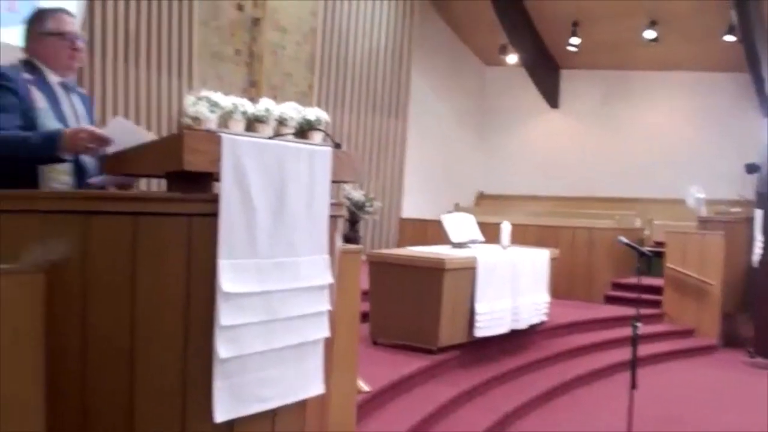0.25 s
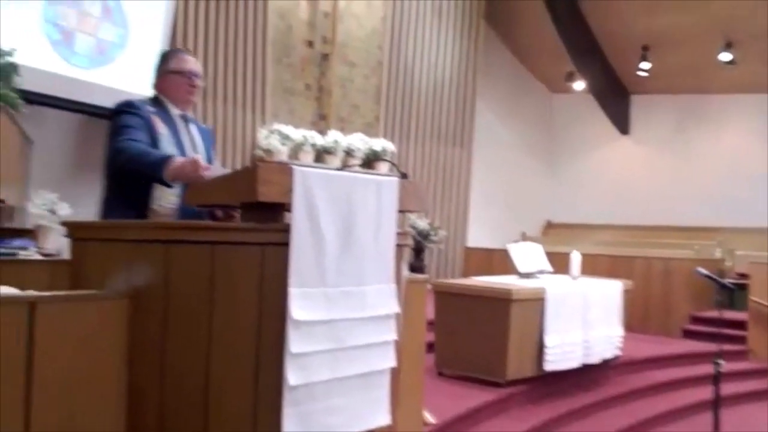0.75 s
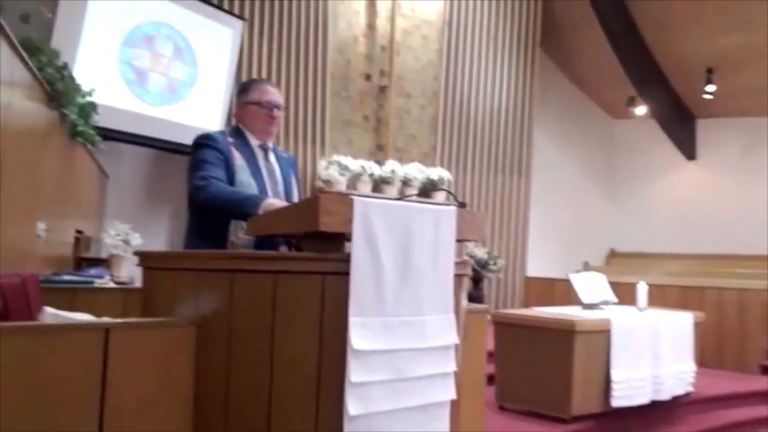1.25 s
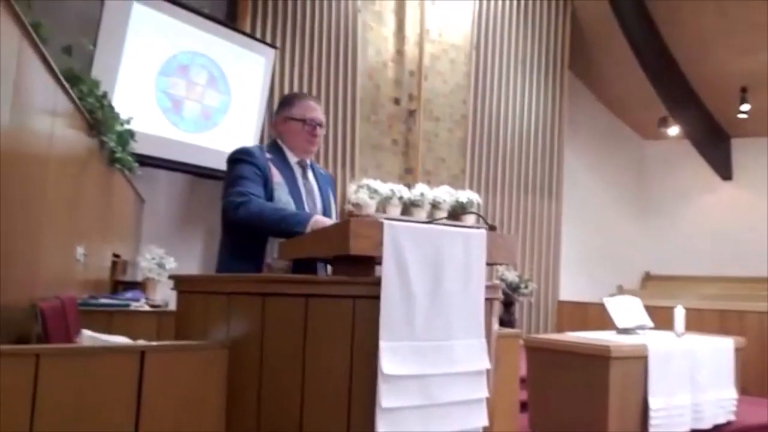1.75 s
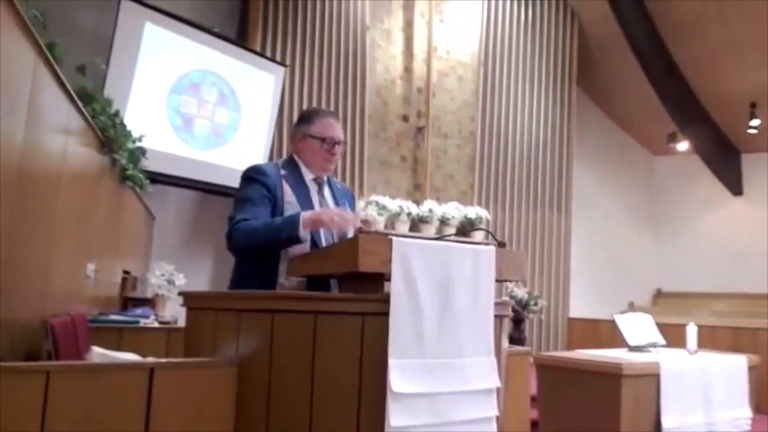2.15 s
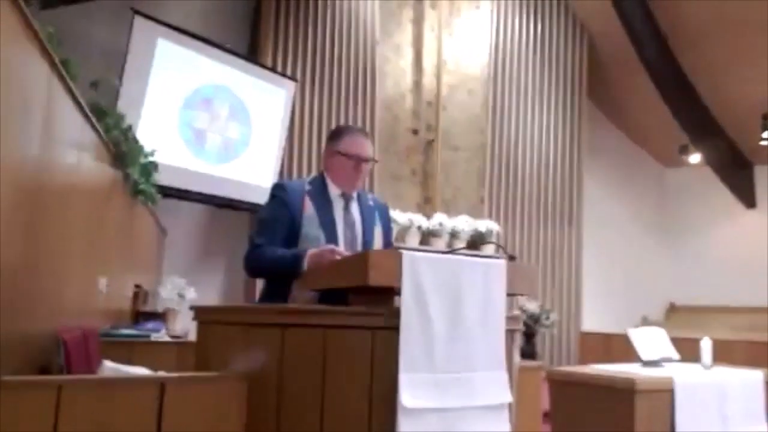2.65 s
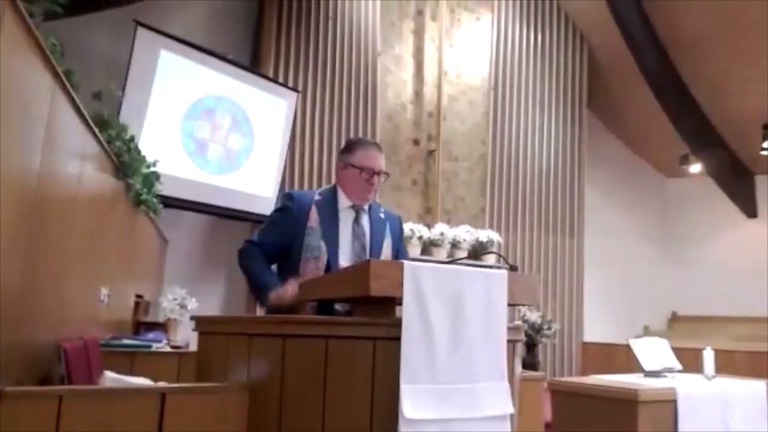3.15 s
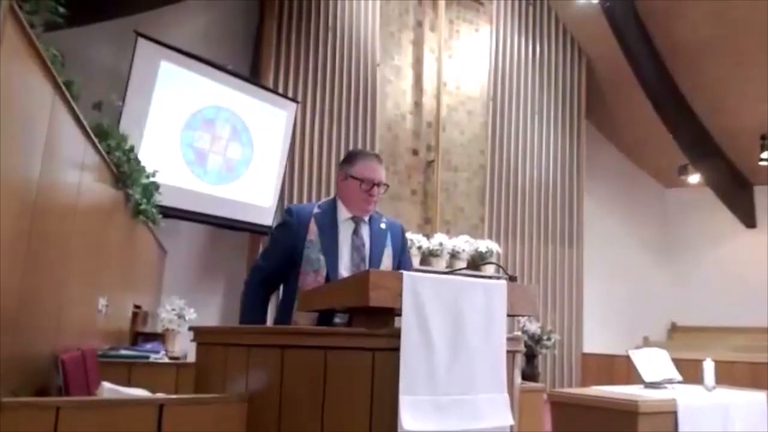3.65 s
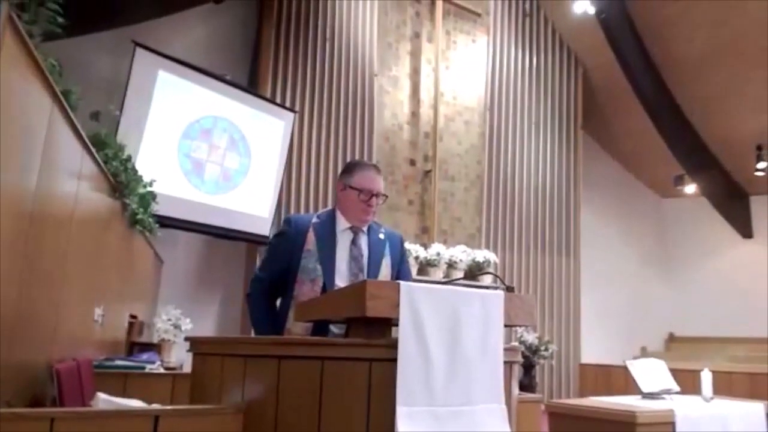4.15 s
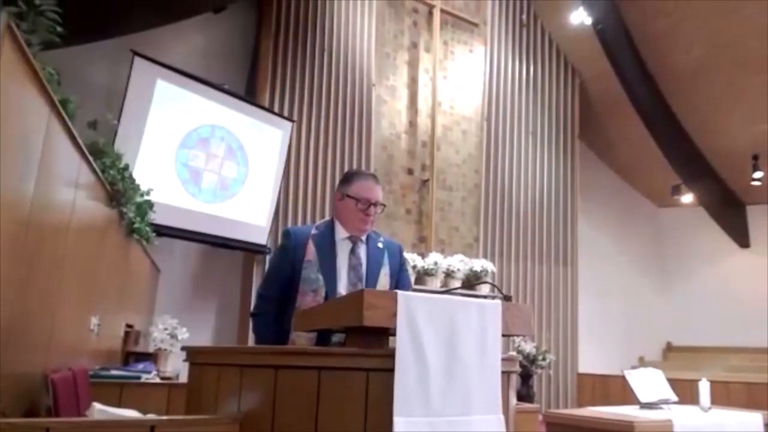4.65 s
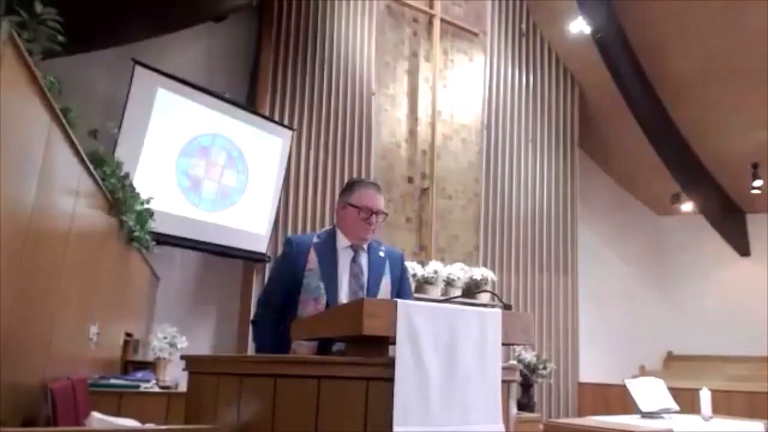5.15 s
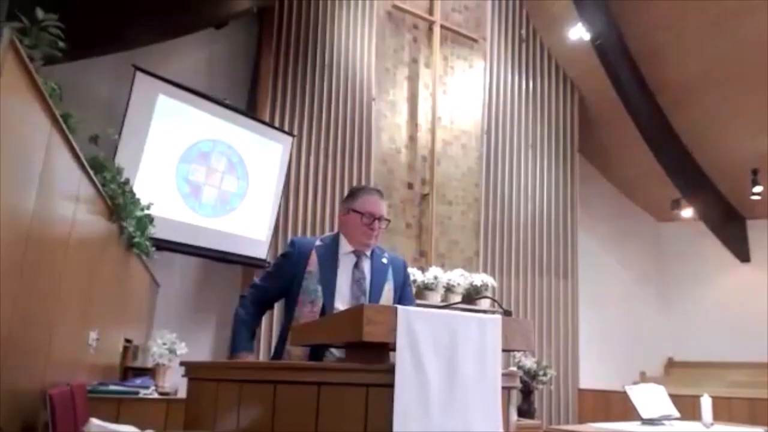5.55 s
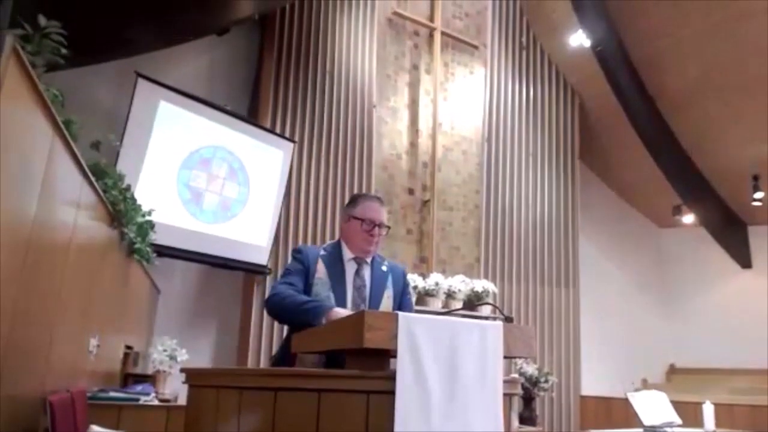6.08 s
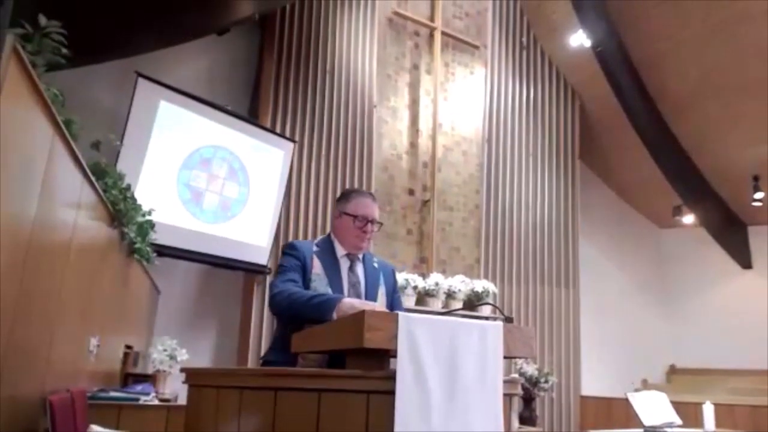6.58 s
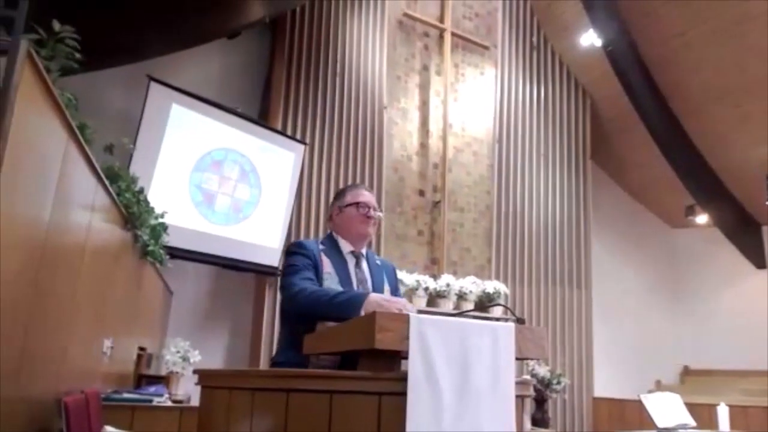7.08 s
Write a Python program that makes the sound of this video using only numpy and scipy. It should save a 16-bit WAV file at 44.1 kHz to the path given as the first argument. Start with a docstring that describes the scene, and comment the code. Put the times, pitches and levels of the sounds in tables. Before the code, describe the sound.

Close at a pulpit microphone in a large quiet hall, sheets of paper swish and scrape on wood while hands bump the hollow desk. Short dropouts break the start. A cluster of sharp knocks and deep thumps peaks near 2.7 seconds, then the sound cuts to a faint buzz for about two seconds. It returns with a low thump and gentler, crisp paper rustles.

```python
"""A wooden pulpit in a large quiet hall: papers are laid on it and slid about beside its microphone.
Paper is friction noise swishing, scraping and hissing; slipping sheets are band noise round one pitch.
Hands bump the desk, which booms through the stand: damped pushes and modes; one such thump is the microphone
cutting in. Small hard things click on it: noise bursts through the desk top's resonances, plus a ping.
The microphone cuts in and out; in the gaps only the sound system's faint buzz, hiss and whine are left."""
import sys
import numpy as np
from scipy import signal
from scipy.fft import rfft, irfft, next_fast_len
from scipy.io import wavfile
from scipy.ndimage import uniform_filter1d, map_coordinates

SR = 44100
rng = np.random.default_rng(int(sys.argv[2]) if len(sys.argv) > 2 else 0)


def put_to_file(sound):
    """Save the sound as 16-bit audio at rate SR, in the file named by the first command-line argument."""
    columns = np.atleast_2d(sound).T  # one column per channel
    safe = np.clip(columns, -1, 1)
    whole_steps = np.round(safe * 32767)
    wavfile.write(sys.argv[1], SR, whole_steps.astype(np.int16))


N = 322944
TIME = np.arange(N) / SR
MOTION_TIME = TIME[::64]  # coarse clock for slow envelopes


def amp(db):
    """Decibels to gain."""
    return np.exp(np.asarray(db) * (np.log(10) / 20))


def unit(x):
    """Scale to rms 1."""
    return x / np.sqrt(np.mean(x ** 2) + 1e-20)


def noise():
    """White noise over the whole scene."""
    return rng.standard_normal(N)


def along(points, hz):
    """Interpolate (Hz, value) points on a log frequency axis."""
    point_hz, value = np.transpose(points)
    return np.interp(np.log(hz + 1), np.log(point_hz + 1), value)


def window(start, stop, edge):
    """1 between two times, with ramps edge seconds long."""
    return np.clip(np.minimum(TIME - start, stop - TIME) / edge + .5, 0, 1)


def wobble(rate):
    """A smooth random curve, rate knots a second."""
    knots = rng.standard_normal(int(N * rate / SR) + 4)
    return map_coordinates(knots, [TIME * rate])


def filtered(x, response):
    """Apply a complex response of frequency to x."""
    m = next_fast_len(len(x) + 8192, True)
    hz = np.fft.rfftfreq(m, 1 / SR)
    return irfft(rfft(x, m) * response(hz), m)[:len(x)]


def coloured(x, spectrum):
    """Lay a spectrum on x, at rms 1."""
    return unit(filtered(x, lambda hz: amp(along(spectrum, hz))))


def add(track, s, sound):
    """Mix a sound in at time s."""
    part = track[max(round(s * SR), 0):][:len(sound)]
    part += sound[:len(part)]


def gesture(start, length, rise, fade, sag_db):
    """A movement's envelope: rises, sags sag_db a second while it lasts, then falls 20 dB per fade seconds."""
    t = MOTION_TIME - start
    fall_db = sag_db * np.clip(t, 0, length) + 20 * np.clip((t - length) / fade, 0, 10)
    return np.clip(t / rise, 0, 1) * amp(-fall_db)


def together(envelopes, levels_db, rest_db):
    """Overlapping movements add in power, over a resting level; one gain per sample."""
    power = np.sum((amp(levels_db)[:, None] * envelopes) ** 2, axis=0) + amp(rest_db) ** 2
    return np.interp(TIME, MOTION_TIME, np.sqrt(power))


# Live spans of the microphone. Each row: start in seconds, stop in seconds.
LIVE_SPANS = [(.327, .371), (.581, .969), (1.029, 2.389), (2.505, 2.514), (2.531, 3.701), (5.618, 5.628),
              (5.717, 7.4)]


def microphone():
    """The microphone cuts in and out: 1 while live, 0 when cut."""
    return sum(window(start, stop, edge=.004) for start, stop in LIVE_SPANS)


# Overtones of the buzz. Each row: frequency in Hz, relative level in dB.
BUZZ_OVERTONES = [(120, -0.5), (360, 0), (900, 0.5), (2000, 1), (4000, 1), (8000, -3), (15000, -19)]
# Spectrum of the system hiss. Each row: frequency in Hz, relative level in dB.
HISS_SPECTRUM = [(20, 16.5), (100, 12), (500, 11.5), (2000, 3.5), (6000, -3.5), (14000, -4.5), (16000, -8)]
LULL_S, BLIP_S = .41, .02  # the line sinks this long after a cut, unless the microphone was live only for a blip


def mains(duty, buzz_db, hum_db, hiss_db, whine_db, lull_db):
    """A rectifier switches twice each mains cycle: a squarish buzz with hum, hiss and a thin whine."""
    mains_hz = 60
    order = np.arange(1, 125)
    hz = 2 * mains_hz * order
    # a sharp rising edge and a rounder falling one
    falling = np.exp(-2j * np.pi * order * duty) / (1 + (hz / 1400) ** 2)
    edges = (1 - falling) / (1j * order)
    phase = np.linspace(0, 1, 1024)
    harmonics = np.exp(2j * np.pi * np.outer(order, phase))
    cycle = np.real((edges * amp(along(BUZZ_OVERTONES, hz))) @ harmonics)

    hum = np.sin(2 * np.pi * mains_hz * TIME)
    # the two halves of a mains cycle differ a little in size
    buzz = unit(np.interp(2 * mains_hz * TIME % 1, phase, cycle)) * (1 + 0.24 * hum)
    whine_hz = 9110 + 70 * wobble(330)
    whine = unit(np.sin(2 * np.pi * np.cumsum(whine_hz) / SR))
    hiss = coloured(noise(), HISS_SPECTRUM)
    lulls = [window(cut, cut + LULL_S, edge=.008) for start, cut in LIVE_SPANS if cut - start > BLIP_S]
    lull = np.max(lulls, axis=0)
    line = amp(buzz_db) * buzz + amp(hum_db) * hum + amp(hiss_db) * hiss
    return line * amp(lull_db * lull) + amp(whine_db) * whine * (1 - lull)


# Reverberation of the hall. Each row: frequency in Hz, t60 in seconds.
HALL_DECAY = [(100, 1.4), (1000, 0.8), (4000, 0.71), (12000, 0.69)]


def hall(x):
    """The hall's answer: decaying noise, each frequency dying at its own speed."""
    hz, t, z = signal.stft(rng.standard_normal(SR), SR, nperseg=256)
    decay = amp(-60 * t / along(HALL_DECAY, hz)[:, None])
    tail = signal.istft(z * decay, SR, nperseg=256)[1]
    return signal.fftconvolve(x, tail / np.linalg.norm(tail))[:N]


# Spectrum of the hall's air. Each row: frequency in Hz, relative level in dB.
AIR_SPECTRUM = [(25, -10), (45, -11.5), (57, 7.5), (72, -11), (200, -16.5), (400, -21), (800, -26.5),
                (1300, -28), (1600, -35), (2100, -31.5), (4000, -39.5), (8000, -40.5), (13000, -41.5),
                (16000, -58)]


def hall_air(level_db):
    """The steady air of the hall: stationary coloured noise."""
    return amp(level_db) * coloured(noise(), AIR_SPECTRUM)


# An arm leans on the desk. Each row: start in seconds, length in seconds, pulpit boom in dB,
# stand sway in dB, desk groan in dB.
ARM_LEANS = [(.54, .36, -46.5, -45, -53), (1.16, .44, -41, -45, -43), (2.19, .16, -40.5, -44, -47),
             (2.65, .12, -39, -49, -37), (3.07, .17, -39, -45, -46.5), (5.8, .58, -47, -40.5, -51.5),
             (6.45, .87, -48.5, -39, -54)]
# Spectra of sway, boom and groan. Each row: frequency in Hz, relative level in dB.
SWAY_SPECTRUM = [(10, -20), (22, -5), (29, 6.5), (38, -13.5), (55, -25.5), (100, -47), (300, -120)]
BOOM_SPECTRUM = [(25, -22.5), (42, -13), (56, 0.5), (70, -5), (90, -9), (130, -25), (250, -51), (700, -120)]
GROAN_SPECTRUM = [(60, -16.5), (95, -9), (122, 6.5), (165, -8.5), (228, -5), (295, -5.5), (400, -24.5),
                  (900, -37), (2500, -120)]
LEAN_RISE_S, LEAN_FADE_S, LEAN_SAG_DB_PER_S = .06, .22, .5  # the weight comes on and eases off
REST_BOOM_DB, REST_SWAY_DB, REST_GROAN_DB = -53, -58, -57  # under resting arms


def leaning():
    """Leaning arms sway the stand and make the hollow pulpit boom and groan: noise under slow envelopes."""
    start, length, boom_db, sway_db, groan_db = np.transpose(ARM_LEANS)
    leans = np.array([gesture(s, n, LEAN_RISE_S, LEAN_FADE_S, LEAN_SAG_DB_PER_S)
                      for s, n in zip(start, length)])
    sway = together(leans, sway_db, REST_SWAY_DB) * coloured(noise(), SWAY_SPECTRUM)
    boom = together(leans, boom_db, REST_BOOM_DB) * coloured(noise(), BOOM_SPECTRUM)
    groan = together(leans, groan_db, REST_GROAN_DB) * coloured(noise(), GROAN_SPECTRUM)
    return sway + boom + groan


# Soft low bumps: hand and book on the desk, and the thump as the microphone cuts in at 5.72 s.
# Each row: start in seconds, level in dB, pitch of the push in Hz.
SOFT_BUMPS = [(0.328, -21.5, 45), (0.333, -33, 105), (0.725, -28, 230), (1.199, -26.5, 42),
              (1.325, -23.5, 70), (1.34, -32, 250), (1.474, -20.5, 255), (1.528, -26.5, 240),
              (1.582, -25.5, 90), (2.204, -27, 59), (2.245, -27, 66), (2.275, -33, 290), (2.531, -22, 110),
              (2.559, -16, 90), (2.56, -24, 250), (2.662, -21, 105), (2.703, -19.5, 92), (2.719, -12, 122),
              (2.748, -22.5, 330), (2.769, -23, 122), (3.082, -22, 135), (3.134, -23.5, 65),
              (3.177, -18.5, 48), (5.715, -20, 21), (5.717, -31, 150), (5.87, -28, 58), (6.451, -22.5, 55),
              (7.225, -28, 60)]
# The desk's low modes. Each row: frequency in Hz, relative level in dB, t60 in seconds.
DESK_MODES = [(30, -1.5, .3), (58.4, -7.5, 0.41), (77.5, -5.5, 0.29), (101.5, -6, .2), (119.2, -2.5, 0.47),
              (227, 2, .45), (255, -6, 0.097), (293.4, -7, 0.36), (455, -6, 0.35)]
# Dull thud of a palm on wood. Each row: frequency in Hz, relative level in dB.
THUD_SPECTRUM = [(60, -20.5), (180, -1.5), (330, 4.5), (480, -1), (720, -2.5), (1100, -9), (1600, -24.5),
                 (4000, -70.5)]


def bumps(ring_db, cycles, spread, thud_db, thud_t60):
    """A soft push heaves for a cycle or two and rings the desk modes near its own pitch."""
    out, t = np.zeros(N), np.arange(SR // 2) / SR
    for s, db, push_hz in SOFT_BUMPS:
        u = t * push_hz / cycles
        push = u * np.exp(1 - u) * np.sin(2 * np.pi * push_hz * t)
        ring = np.zeros(len(t))
        # each bump excites the modes a little differently
        for (hz, level_db, t60), spot_db in zip(DESK_MODES, rng.normal(0, 1.5, len(DESK_MODES))):
            nearness = np.exp(-(np.log(hz / push_hz) / spread) ** 2)
            ring += nearness * amp(level_db + spot_db - 60 * t / t60) * np.sin(2 * np.pi * hz * t)
        # pushes below 120 Hz thud less
        hardness = min(push_hz / 120, 1) ** 2
        thud = coloured(rng.standard_normal(len(t)), THUD_SPECTRUM)
        thud *= hardness * amp(thud_db - 60 * t / thud_t60)
        add(out, s, amp(db - 3) * (push + (amp(ring_db) * ring + thud) * (1 - np.exp(-u))))
    return out


# The desk top's resonances. Each row: frequency in Hz, width in Hz, relative level in dB.
BOARD_RESONANCES = [(670, 280, 2), (1060, 380, 2), (1330, 240, 3), (1990, 430, -4.5), (2740, 600, -4),
                    (3880, 1800, -4.5), (4800, 2300, -4), (7200, 5900, -11.5), (11700, 2500, -15)]


def board(hz):
    """Response of the desk top: resonances summed with alternating sign."""
    total = 0
    for k, (centre_hz, width_hz, db) in enumerate(BOARD_RESONANCES):
        damping = 1j * hz * width_hz
        total = total + (-1) ** k * amp(db) * damping / (centre_hz ** 2 - hz ** 2 + damping)
    return total


# Hard contacts. Each row: start in seconds, level in dB, pitch of the contact in Hz,
# t60 of the chatter in seconds.
HARD_CLICKS = [(.645, -16.5, 2900, 0.054), (1.0988, -22.5, 2700, 0.022), (1.203, -36, 600, .04),
               (1.549, -26, 3550, .02), (2.0743, -37, 800, 0.022), (2.2751, -37.5, 800, 0.03),
               (2.5318, -20, 1360, 0.097), (2.545, -15, 1600, 0.025), (2.636, -30, 2800, 0.013),
               (2.6642, -22, 1660, 0.028), (2.7438, -9, 2690, 0.031), (2.7535, -22, 1000, .04),
               (2.7749, -16.5, 2950, 0.021), (3.08, -27.5, 2540, .02), (3.2178, -29, 1180, 0.062),
               (3.227, -30, 11100, 0.042), (3.2829, -25, 1210, 0.014), (3.3666, -33, 800, 0.018),
               (3.404, -33.5, 2190, 0.013), (5.6222, -51.5, 1498, 0.022), (5.8503, -33.5, 1500, 0.096),
               (5.9805, -29, 3320, 0.053), (6.4127, -33, 1700, 0.065), (6.4833, -39.5, 2200, 0.021),
               (6.9332, -39, 750, 0.024), (6.9672, -40.5, 1300, 0.03)]


def clicks(crack_db, crack_t60, contact_q, floor_db, ping_db, ping_t60):
    """A sharp crack and a brief chatter ring the desk top; the striking thing pings at its own pitch."""
    out, t = np.zeros(N), np.arange(SR // 8) / SR
    for s, db, pitch_hz, t60 in HARD_CLICKS:
        chatter, crack = amp(-60 * t / t60), amp(crack_db - 60 * t / crack_t60)
        force = rng.standard_normal(len(t)) * (chatter + crack)

        def contact(hz):
            """One resonance at the contact's pitch, over a flat floor."""
            r = hz / pitch_hz
            return amp(floor_db) + 1j * r / (contact_q * (1 - r * r) + 1j * r)

        click = filtered(force, lambda hz: board(hz) * contact(hz))
        ping = amp(ping_db - 60 * t / ping_t60) * np.sin(2 * np.pi * pitch_hz * t)
        add(out, s, amp(db) * (click / np.abs(click).max() + ping))
    return out


# A sheet sings as it slips. Each row: start in seconds, stop in seconds, pitch in Hz, width in Hz, level in dB.
SHEET_SLIPS = [(0.579, 1.035, 10800, 1300, -58), (1.034, 1.09, 5400, 1530, -45),
               (1.117, 1.437, 11400, 2430, -51.5), (1.553, 1.76, 7500, 1592, -47.5),
               (1.824, 1.987, 1240, 354, -47), (2.661, 2.703, 11360, 2500, -38),
               (3.123, 3.158, 6500, 1100, -45.5)]


def slips():
    """Even stick and slip of a sheet gathers its hiss round one pitch."""
    out = np.zeros(N)
    for start, stop, pitch_hz, width_hz, db in SHEET_SLIPS:
        rush = rng.standard_normal(SR)[:max(int((stop - start) * SR), 64)]
        band = filtered(rush, lambda hz: 1 / (1 + ((hz - pitch_hz) / (width_hz / 2)) ** 2))
        add(out, start, amp(db) * unit(band) * signal.windows.tukey(len(band), .5))
    return out


def friction(catches_per_s, grain_db, patchy_db):
    """Fibres catching: a fine rush with sparse sharper catches, its colour shifting as the contact moves."""
    catches = (rng.random(N) < catches_per_s / SR) * noise()
    z = signal.stft(noise() + amp(grain_db) * unit(catches), nperseg=512)[2]
    # random gains smoothed over frequency, then time
    field = uniform_filter1d(rng.standard_normal(z.shape), size=9, axis=0)
    field = uniform_filter1d(field, size=10, axis=1)
    return signal.istft(z * amp(patchy_db * unit(field)), nperseg=512)[1][:N]


# Strokes of paper over the desk. Each row: start in seconds, length in seconds, seconds to fade 20 dB,
# swish in dB, scrape on the wood in dB over the swish, edge hiss in dB over the swish.
PAPER_STROKES = [(.32, .05, .05, -57.5, 7, -2.5), (.565, .125, .15, -53.3, 5, -1.5),
                 (.69, .07, .8, -57, 0, -5), (1.015, .085, .05, -45, .5, 2), (1.08, .17, .25, -49, -7, 8),
                 (1.22, .24, .4, -48.5, -5, 4), (1.47, .28, .3, -45.3, -8, 4),
                 (1.78, .15, .08, -48.3, -1, -3.5), (1.88, .06, .06, -45.5, -3, -3),
                 (1.97, .07, .1, -53, -1, -4), (2.03, .1, .08, -56, 1, 3.5), (2.148, .04, .07, -46, -13, 3),
                 (2.27, .11, .1, -59.5, 7, -2), (2.49, .09, .12, -46, 3, -2),
                 (2.605, .125, .1, -45, 1, 2.5), (2.79, .11, .1, -49.5, -1, -2.5),
                 (2.91, .24, .14, -46.5, -3.5, -4), (3.28, .14, .06, -58.5, 2, 0),
                 (5.84, .14, .1, -54, 0, -2), (5.97, .11, .1, -40.3, -10, 2.5),
                 (6.095, .1, .22, -43.7, -11, 4.5), (6.22, .07, .15, -49, -3, -5),
                 (6.36, .26, .2, -59.5, 2.5, -1), (6.635, .05, .07, -50, -5, -2.5),
                 (6.755, .045, .04, -54, -5, 1), (6.82, .09, .15, -66, 3, -10),
                 (7.105, .165, .05, -47, -8.5, -3.5)]
# Spectra of scrape, swish and edge hiss. Each row: frequency in Hz, relative level in dB.
SCRAPE_SPECTRUM = [(60, -60.5), (330, -3.5), (450, -5.5), (700, -1.5), (1200, -4.5), (1560, -13),
                   (2000, -10.5), (3500, -23), (16000, -75.5)]
SWISH_SPECTRUM = [(500, -50.5), (1600, -7.5), (2100, -1), (3200, 2), (5000, 2.5), (7000, -0.5),
                  (9500, -8.5), (16000, -32.5)]
EDGE_SPECTRUM = [(2500, -49.5), (6500, -8.5), (8500, -5.5), (10500, -2.5), (13000, -5.5), (15000, -10.5),
                 (16000, -13.5), (18000, -63)]
STROKE_RISE_S, STROKE_SAG_DB_PER_S = .025, 6  # a stroke takes hold quickly and slows a little as it goes
REST_SCRAPE_DB, REST_SWISH_DB, REST_EDGE_DB = -63, -67, -70  # the faint rubbing between strokes


def paper():
    """Each stroke of a sheet swishes, scrapes the wood and hisses at its edge, under one unsteady pressure."""
    start, length, fade, swish_db, scrape_db, edge_db = np.transpose(PAPER_STROKES)
    strokes = np.array([gesture(s, n, STROKE_RISE_S, f, STROKE_SAG_DB_PER_S)
                        for s, n, f in zip(start, length, fade)])
    pressure_db = .9 * wobble(90)
    scrape = coloured(friction(catches_per_s=160, grain_db=-10.5, patchy_db=3), SCRAPE_SPECTRUM)
    swish = coloured(friction(catches_per_s=260, grain_db=-9.5, patchy_db=1.83), SWISH_SPECTRUM)
    edge = coloured(friction(catches_per_s=510, grain_db=-6, patchy_db=2.05), EDGE_SPECTRUM)
    scrape *= together(strokes, swish_db + scrape_db, REST_SCRAPE_DB)
    swish *= together(strokes, swish_db, REST_SWISH_DB)
    edge *= together(strokes, swish_db + edge_db, REST_EDGE_DB)
    return amp(pressure_db) * (scrape + swish + edge)


def scene():
    """Everything at the pulpit is heard only while its microphone is live; the buzz goes on while it is cut."""
    buzz = mains(duty=.53, buzz_db=-64, hum_db=-75, hiss_db=-77.5, whine_db=-90, lull_db=-10.5)
    soft = bumps(ring_db=-7.5, cycles=.7, spread=.55, thud_db=-15.5, thud_t60=0.1)
    hard = clicks(crack_db=6.5, crack_t60=.002, contact_q=0.98, floor_db=-3.5, ping_db=-4.5, ping_t60=0.0041)
    desk = soft + hard
    pulpit = hall_air(level_db=-46) + leaning() + desk + amp(-18) * hall(desk) + slips() + paper()
    return (amp(-.5) * pulpit * microphone() + buzz)[None]


TOP_HZ = 15850


def record(dry):
    """A very steep low-pass, at half amplitude at TOP_HZ."""
    return filtered(dry[0], lambda hz: 1 / (1 + (hz / TOP_HZ) ** 200))[None]


dry = scene()
out = record(dry)
put_to_file(out)
```